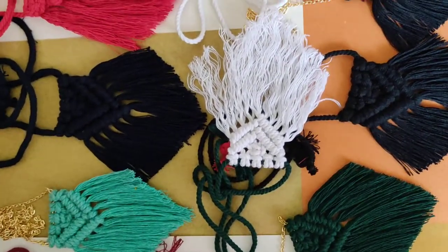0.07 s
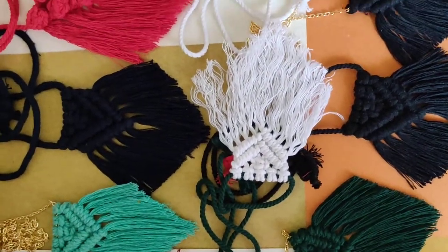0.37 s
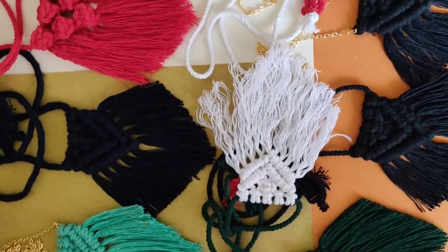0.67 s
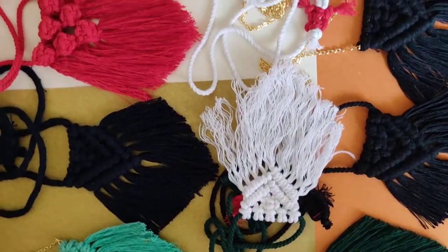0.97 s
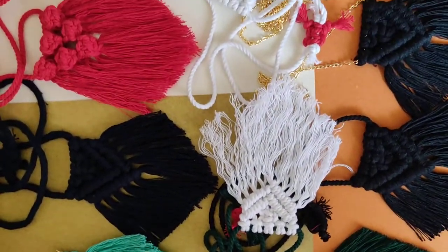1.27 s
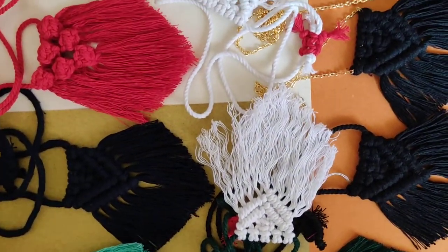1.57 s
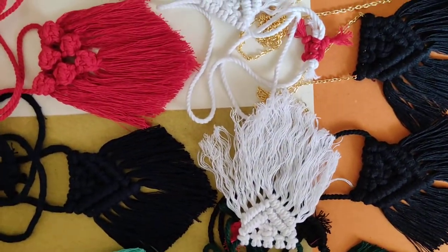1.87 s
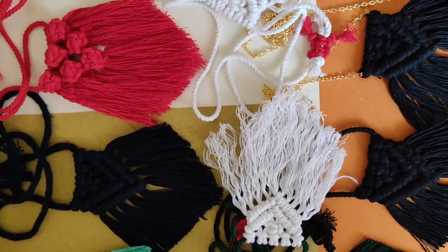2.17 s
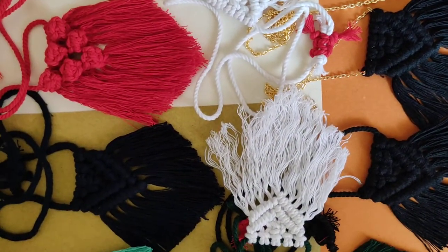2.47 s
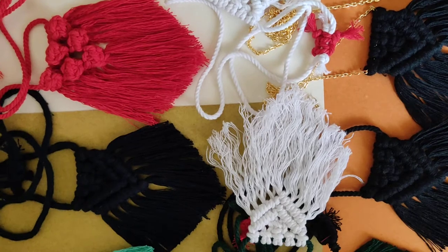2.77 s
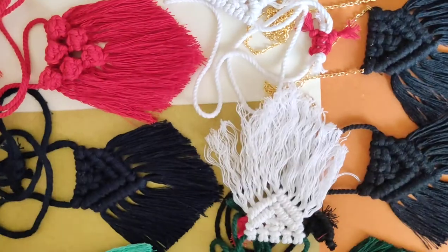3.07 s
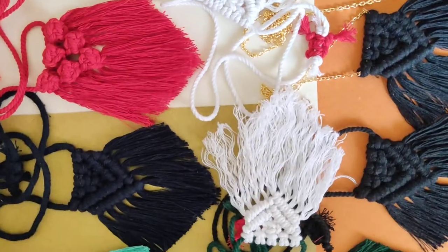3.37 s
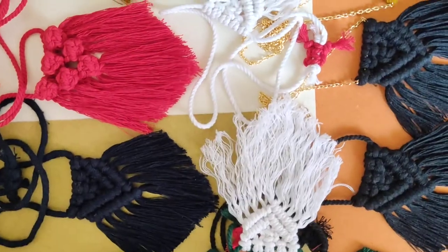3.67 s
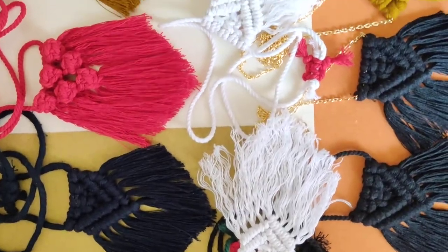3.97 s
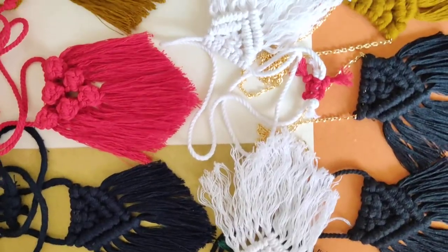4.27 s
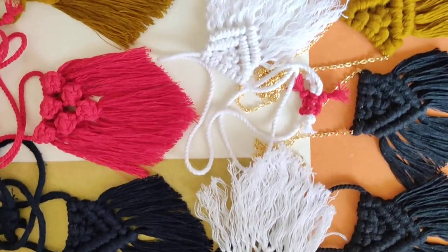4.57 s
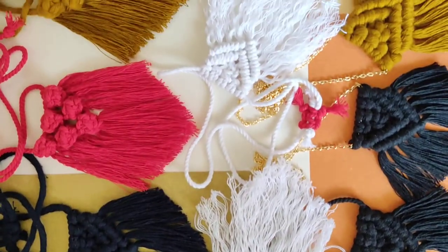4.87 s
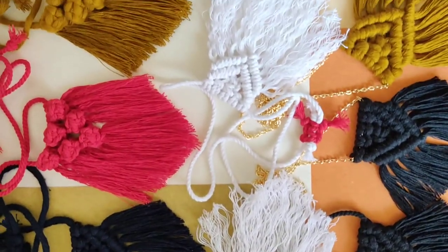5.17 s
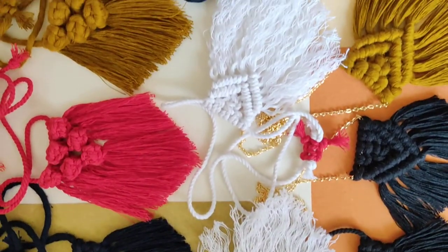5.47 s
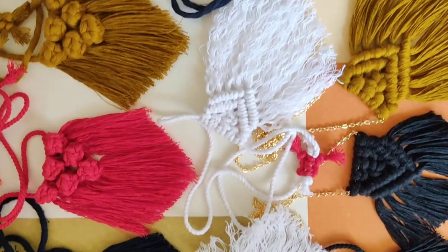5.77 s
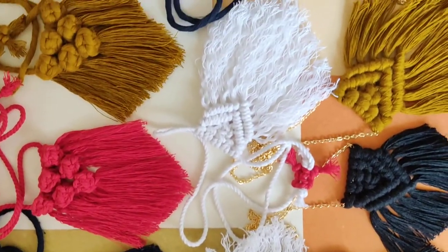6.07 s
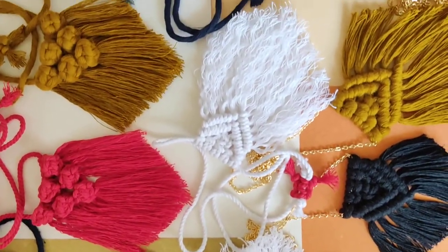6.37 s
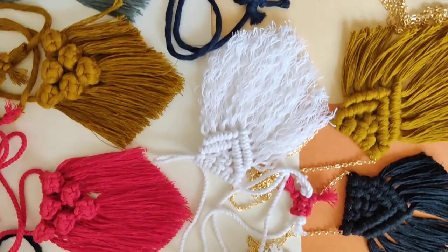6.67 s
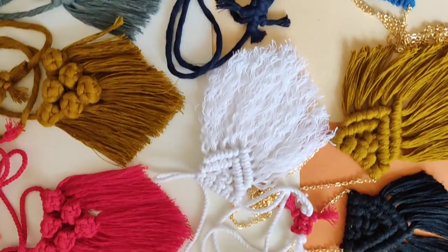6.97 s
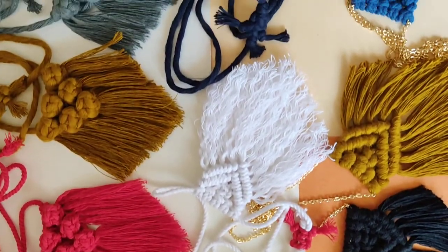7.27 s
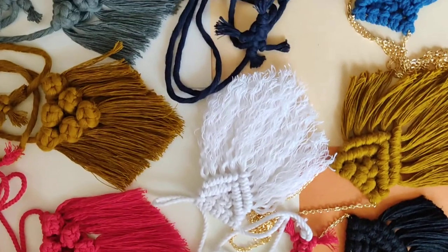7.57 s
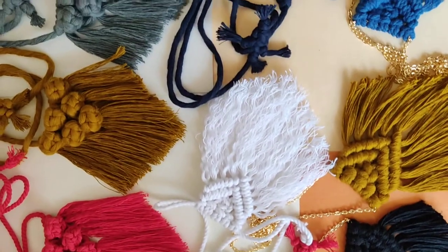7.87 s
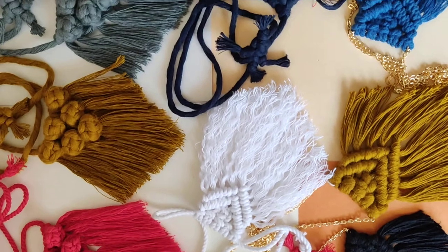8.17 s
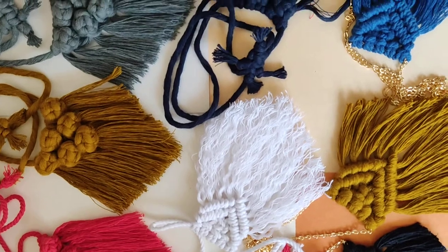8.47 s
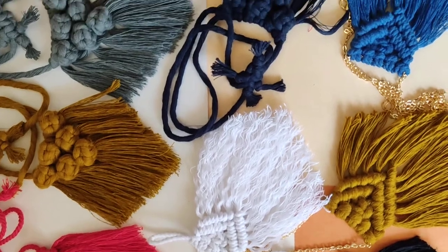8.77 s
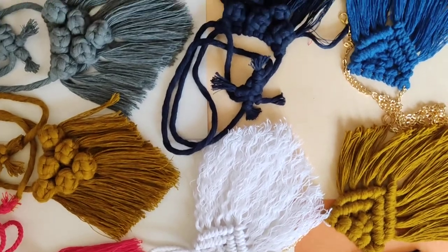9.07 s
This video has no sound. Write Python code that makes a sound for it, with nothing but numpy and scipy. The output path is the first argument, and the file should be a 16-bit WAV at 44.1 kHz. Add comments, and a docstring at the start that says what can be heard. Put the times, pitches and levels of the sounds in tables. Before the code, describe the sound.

Scattered brush strokes rub across a hollow-sounding board, then settle into unbroken, brisk scrubbing. The bristles rasp and hiss while the board booms underneath, and the tone shifts as the brush moves to another spot, adding a few short squeaks and ticks. A fan hums steadily in the small room, and the hand-held phone picks up occasional soft finger thuds.

```python
"""A fan drones in a small room as a brush starts on a board in stray strokes: the rubbing roars, the
board booms, the bristles rasp, hiss and tick. Now and then a finger bumps the hand-held phone.
From 1.3 s to 4 s some strokes ring the hollow under the board. Near 2.5 s the scrubbing turns
unbroken, about four strokes a second, with brief squeaks; from 5 s to 7 s it moves to a second spot
and changes colour. Throughout, each of the phone's two microphone ports rings near 8 kHz."""
import sys
import numpy as np
from scipy import signal
from scipy.fft import rfft, irfft, next_fast_len
from scipy.io import wavfile
from scipy.ndimage import uniform_filter1d

SR = 44100
rng = np.random.default_rng(int(sys.argv[2]) if len(sys.argv) > 2 else 0)


def transcribe(u):
    """Save the signal u as a 16-bit wav file named by the first command-line argument.

    u: samples, shape (n,) or (channels, n), limited to [-1, 1]; the rate is SR.
    q: integer samples, one column per channel.
    """
    v = np.clip(np.atleast_2d(u).T, -1, 1)
    q = np.round(v * 32767).astype(np.int16)
    wavfile.write(sys.argv[1], SR, q)


N = 411012
T = np.arange(N) / SR
FFT_SIZE = 2 * next_fast_len(N // 2 + 1024)
FREQ = np.maximum(np.arange(FFT_SIZE // 2 + 1) * SR / FFT_SIZE, 1)


def undb(db):
    """Decibels to gain."""
    return 10 ** (np.asarray(db) / 20)


def automation(table):
    """One lane per column after the time, with straight ramps between the rows."""
    times, *columns = np.transpose(table)
    return [np.interp(T, times, column) for column in columns]


def eq_curve(points):
    """Breakpoints joined by straight lines over log frequency."""
    hz, value = np.transpose(points)
    return np.interp(np.log(FREQ), np.log(hz), value)


def bell(hz, width):
    """Shape of one resonance, 1 at its centre."""
    return 1 / (1 + (2 * (FREQ - hz) / width) ** 2)


def colour(sound, gain):
    """EQ a sound with one gain per frequency."""
    return irfft(rfft(sound, FFT_SIZE) * gain, FFT_SIZE)[..., :N]


def normalise(pair, band_hz):
    """Scale a stereo pair so that its mid has rms 1 inside a band."""
    in_band = (FREQ > band_hz[0]) & (FREQ < band_hz[1])
    return pair / np.std(colour(pair.mean(0), in_band))


def leveller(pair, span_s):
    """Ride the gain to hold a sound's running rms near 1."""
    power = uniform_filter1d(np.mean(pair ** 2, axis=0), int(span_s * SR))
    return pair / np.sqrt(np.maximum(power, 1e-6 * power.mean()))


def wander(rate_hz):
    """Random modulator: sample and hold, slewed twice, with rms near 1."""
    hold = int(SR / rate_hz)
    steps = np.repeat(rng.standard_normal(N // hold + 1), hold)
    return 1.172 * uniform_filter1d(uniform_filter1d(steps, hold), hold)[:N]


# How alike the room sounds at the two ports: (frequency [Hz], correlation [-1..1])
PORT_CORRELATION = [(40, 0.61), (120, 0.86), (250, 1), (370, 0.19), (480, 0.14), (550, 0.59), (605, -0.16),
                    (800, 0.66), (1020, 0.3), (1200, -0.22), (1800, 0.017), (2500, 0.023), (4000, 0.0056)]
def spread(pair):
    """Two unrelated noises become left and right: narrow in the bass, wide in the treble."""
    likeness = np.clip(eq_curve(PORT_CORRELATION), -0.99, 0.99)
    mid, side = colour(pair, np.sqrt([1 + likeness, 1 - likeness]) / np.sqrt(2))
    return np.array([mid + side, mid - side]) / np.sqrt(2)


def grainy_noise(grain_db, grain_hz):
    """Stereo noise with a flickering level, like tiny slips bunching as a contact grips and lets go."""
    return spread(rng.standard_normal((2, N)) * undb(grain_db * wander(grain_hz)))


# Tone of the fan's moving air: (frequency [Hz], relative level [dB])
FAN_EQ = [(25, -1), (43, -7), (60, -6), (81, -5.5), (124, -20.5), (206, -9.5), (341, -23.5), (493, -16.5),
          (874, -23.5), (1290, -22.5), (1450, -29), (2000, -30.5), (2240, -35), (6000, -52.5)]
def fan(air_db, hum_hz, hum_db):
    """The bed: steady moving air and a wavering motor hum."""
    treble_cut_db = 6 * np.log2(np.maximum(FREQ / 5000, 1))
    bass_cut_db = 10 * np.log2(np.maximum(38 / FREQ, 1))
    tone = undb(eq_curve(FAN_EQ) - treble_cut_db - bass_cut_db)
    air = normalise(colour(grainy_noise(grain_db=1.5, grain_hz=9.2), tone), band_hz=(150, 3000))
    phase = 2 * np.pi * np.cumsum(hum_hz + 1.147 * wander(5.4)) / SR
    hum = np.sqrt(2) * np.sin(phase) * undb(0.82 * wander(7.7))
    return undb(air_db) * air + undb(hum_db) * hum


def stroke(start, attack, length, release_s=0.27):
    """Envelope of one push: the load rises, holds to the stroke's end, then falls 60 dB per release."""
    age = T - start
    return np.clip(age / attack, 0, 1) * undb(-60 * np.maximum(age - length, 0) / release_s)


# The brush dragging on between strokes, levels before trim:
# (time [s], rubbing [dB], rasp [dB], hiss [dB], boom [dB])
DRAG_LEVELS = [(0.0, -58.5, -66, -78, -55.5), (2.38, -49.5, -63, -74, -48.5), (2.65, -35, -52, -48.5, -39),
               (3.1, -44, -61, -59, -45.5), (3.4, -43.5, -54, -68.5, -40.5), (3.7, -39, -53.0, -52.5, -35),
               (4.1, -43.5, -54, -55.5, -40.5), (4.5, -35.5, -54, -52.5, -38),
               (4.95, -37.5, -51.5, -60.5, -45), (5.4, -37, -52, -53, -36), (6.1, -35.5, -50, -54.5, -41),
               (6.5, -35, -48.5, -54.5, -37.0), (7.0, -32, -43.5, -48, -33.5),
               (7.6, -33, -45.5, -49, -32.5), (8.2, -33.5, -43.5, -49.5, -32),
               (8.7, -32, -43.5, -46.5, -33.5), (8.93, -34, -45.5, -49, -36),
               (9.32, -31.5, -50, -48.5, -28.5)]
# Pushes of the brush, levels before trim:
# (start [s], attack [s], length [s], rubbing [dB], rasp [dB], hiss [dB], boom [dB])
BRUSH_STROKES = [(0.257, 0.028, 0.073, -36.5, -59, -82, -41.5),
                 (0.461, 0.034, 0.045, -36.5, -62.5, -74, -38), (0.843, 0.04, 0.069, -47, -58, -85, -50),
                 (1.02, .03, 0.075, -52, -63, -82, -52), (1.273, 0.019, 0.013, -39, -60, -67, -37),
                 (1.415, 0.048, 0.08, -35.5, -51.5, -53.5, -37.5),
                 (1.619, 0.036, 0.078, -38, -49, -55.5, -39), (1.73, 0.014, 0.057, -40, -63, -68, -43),
                 (1.885, 0.019, 0.13, -43.5, -59, -71, -43.5), (2.064, 0.02, 0.085, -51, -58, -72, -55),
                 (2.431, 0.019, 0.068, -32.5, -46.5, -51, -32.5),
                 (2.592, 0.01, 0.02, -49, -56, -65.5, -29.5),
                 (2.639, 0.037, 0.063, -30.5, -41.5, -45, -25.5),
                 (2.797, 0.077, 0.12, -36.5, -47, -48, -30.5), (2.922, 0.025, 0.083, -35, -47, -52, -41),
                 (3.135, 0.03, 0.042, -35, -46, -55, -47), (3.446, 0.038, 0.078, -33.5, -50, -55.5, -36),
                 (3.67, 0.043, 0.066, -34, -45.5, -48.5, -28),
                 (3.849, 0.063, 0.17, -36.5, -48.5, -51.5, -32.5), (4.1, 0.011, 0.057, -42, -63, -66, -28),
                 (4.161, 0.03, 0.071, -31.5, -42.5, -47.5, -31), (4.29, 0.02, 0.031, -40, -60, -55, -32),
                 (4.388, 0.031, 0.071, -30.5, -46, -51, -27.5),
                 (4.631, 0.0018, 0.032, -29.5, -58, -74, -35), (4.67, 0.017, 0.06, -41, -45, -52.5, -42),
                 (4.77, 0.034, 0.066, -37, -48, -53.5, -38.5), (4.839, 0.018, 0.038, -31, -53, -57, -39),
                 (4.996, 0.027, 0.064, -34, -45.5, -53, -32.5), (5.213, 0.038, 0.088, -33, -44, -47.5, -28),
                 (5.438, 0.036, 0.13, -32.5, -46, -50.0, -30.5),
                 (5.691, 0.053, 0.11, -29.5, -42.5, -47.5, -31),
                 (5.826, 0.012, 0.055, -32, -43, -49.5, -29.5), (5.911, 0.025, 0.13, -33.0, -49, -49, -32),
                 (6.047, 0.029, 0.041, -32, -44, -48.5, -25),
                 (6.205, 0.0042, 0.072, -30.5, -45, -55.5, -33.5),
                 (6.318, 0.039, 0.016, -51, -49.5, -46.5, -45), (6.444, 0.017, 0.023, -31, -51, -66, -36),
                 (6.595, 0.039, 0.047, -38, -60, -50, -44), (6.72, 0.014, 0.037, -48, -41, -51, -41),
                 (6.8, 0.036, 0.11, -37, -41.5, -45.5, -29), (6.91, 0.025, 0.034, -32, -35.5, -47, -25.5),
                 (7.088, 0.025, 0.066, -33.5, -36, -45.5, -49), (7.15, 0.025, 0.028, -38, -47, -51, -33),
                 (7.327, 0.031, 0.096, -31, -48, -47, -31.5), (7.669, 0.039, 0.053, -39, -45, -49, -29),
                 (7.843, 0.016, 0.056, -28.5, -45, -64, -31), (7.885, 0.011, 0.052, -36, -37.5, -44.5, -36),
                 (8.082, 0.0038, 0.018, -29, -40.5, -46.5, -35),
                 (8.324, 0.035, 0.051, -51, -45.5, -49, -44), (8.405, 0.012, 0.04, -55, -56, -58, -28.5),
                 (8.47, 0.034, 0.081, -38, -47, -44.5, -29.5), (8.563, 0.031, 0.14, -38, -46, -62, -32.5),
                 (8.738, 0.027, 0.14, -34.5, -45, -49, -29), (8.96, 0.026, 0.083, -33.5, -53, -51, -30),
                 (9.026, 0.028, 0.15, -38, -41, -47, -28.5), (9.242, 0.035, 0.093, -32, -41, -44.5, -31.5)]
def hand_pressure():
    """Envelopes of rubbing, rasp, hiss and boom: the strokes ride on the drag, adding in power."""
    power = undb(automation(DRAG_LEVELS)) ** 2
    for start, attack, length, *levels_db in BRUSH_STROKES:
        power += np.outer(undb(levels_db) ** 2, stroke(start, attack, length) ** 2)
    return np.sqrt(power)


# Resonances shared by rubbing, rasp and hiss: (centre [Hz], width [Hz], boost [dB])
SURFACE_PEAKS = [(385.6, 18.4, 8), (486.5, 19.6, 6.5), (555, 16, 8), (629, 76, 6.5), (721, 26, 4),
                 (787, 26, 4), (966, 130, 2.5), (1180, 55, 5), (2030, 27, -1.5), (5160, 54, 4),
                 (6160, 32, 3)]
def surface(broad_eq):
    """Gain per frequency: a broad EQ with the rubbed surface's resonances on top."""
    return undb(eq_curve(broad_eq) + sum(db * bell(hz, width) for hz, width, db in SURFACE_PEAKS))


# Tone of the rubbing at each of two spots: (frequency [Hz], relative level [dB])
FIRST_SPOT_EQ = [(120, -40), (280, -2.5), (350, -4.5), (450, 3), (600, -0.5), (850, -5.5), (1050, -1),
                 (1400, -19.5), (2500, -41), (5000, -52)]
SECOND_SPOT_EQ = [(120, -31), (270, -7), (340, 3), (450, 1), (600, -3), (850, -2), (1050, -2.5),
                  (1400, -13.5), (2000, -14.5), (5000, -51)]
def rubbing(place):
    """The body: countless slips blur into a hollow roar, crossfaded between the two spots."""
    slips = grainy_noise(grain_db=1.5, grain_hz=120)
    first = colour(slips, surface(FIRST_SPOT_EQ))
    second = colour(slips, surface(SECOND_SPOT_EQ))
    roar = leveller((1 - place) * first + place * second, span_s=0.08)
    return normalise(roar, band_hz=(350, 1300))


# Tone of the flattened bristles: (frequency [Hz], relative level [dB])
RASP_EQ = [(700, -36), (1300, 1), (1550, -2), (1970, 0.5), (2250, -2), (2650, -2.5), (3200, -11.5),
           (5000, -28.5)]
def rasp():
    """The bite: the coarse scrape of bristles pressed flat."""
    scrape = colour(grainy_noise(grain_db=1.5, grain_hz=350), surface(RASP_EQ))
    return normalise(scrape, band_hz=(1400, 3000))


# Tone of the sweeping bristles: (frequency [Hz], relative level [dB])
HISS_EQ = [(1500, 0), (2600, 3), (3300, 0.5), (4500, 1), (6200, -2), (9000, -5), (10000, -9)]
def bristle_hiss():
    """The top: bristles sweep the surface with a fine, slightly grainy hiss."""
    hiss = colour(grainy_noise(grain_db=0.5, grain_hz=540), surface(HISS_EQ))
    return normalise(hiss, band_hz=(3300, 6500))


# Modes of the board: (centre [Hz], width [Hz], weight at first spot [dB], weight at second spot [dB])
BOARD_MODES = [(132, 36, -3.5, -9), (171, 21, -17.5, -8.5), (208.4, 17.6, 6.5, -6),
               (229.6, 23.4, 2.5, -1.5), (266, 26, -4, 1.5), (326, 42, -28.5, -13)]
def board_boom(place):
    """The low end: the dragging contact shakes the board's modes; their mix depends on the spot."""
    drag = grainy_noise(grain_db=3, grain_hz=44)
    first = colour(drag, sum(undb(db) * bell(hz, width) for hz, width, db, _ in BOARD_MODES))
    second = colour(drag, sum(undb(db) * bell(hz, width) for hz, width, _, db in BOARD_MODES))
    boom = leveller((1 - place) * first + place * second, span_s=0.07)
    return normalise(boom, band_hz=(195, 300))


# Soft low thuds, mostly fingers on the phone; the one at 4.12 s is a low board thump:
# (start [s], relative level [dB], cutoff [Hz], time to peak [s])
LOW_THUDS = [(0.161, -19, 239, 0.026), (0.644, -34, 120, 0.013), (1.354, -20, 200, 0.023),
             (2.165, -27.5, 139, 0.03), (4.12, -35, 208, 0.021), (4.7, -28, 111, .03),
             (4.81, -25, 119, 0.021), (5.244, -33, 191, .035), (6.122, -17, 129, 0.0049),
             (7.921, -26, 202, 0.024)]
def low_thuds(gain_db, right_db):
    """Short swells of low noise, far to the left; most are fingers heard through the phone's case."""
    out = np.zeros(N)
    for start, db, cutoff, swell_s in LOW_THUDS:
        age = np.maximum(T - start, 0) / swell_s
        low_band = 1 / np.sqrt((1 + (FREQ / cutoff) ** 8) * (1 + (0.18 * cutoff / FREQ) ** 4))
        thud = colour(rng.standard_normal(N), low_band) * age ** 2 * np.exp(-2 * age)
        rms = np.sqrt(np.sum(thud ** 2) / (2 * swell_s * SR))
        out += undb(db) * thud / rms
    return out * undb(gain_db + np.array([[0], [right_db]]))


# Bristle flicks, brush landings and one thin, very high click at 7.13 s:
# (time [s], relative level [dB], rustle T60 [s], centre [Hz], width [Hz], right minus left [dB])
TICKS = [(.231, -48, 0.2, 7700, 2500, 3), (1.9938, -26, .003, 2150, 2200, 0),
         (2.0067, -41, 0.0044, 10100, 5000, -8), (2.179, -43, .015, 3800, 2000, 2),
         (2.43, -24, .04, 470, 300, 0), (4.632, -23, .015, 900, 700, -3), (6.212, -24, .03, 890, 900, 0),
         (6.927, -33.5, .06, 7500, 600, 9), (7.119, -33, .09, 7760, 1600, 24.5),
         (7.1275, -27, .003, 12200, 1200, 8), (7.129, -40, .08, 7850, 1200, 20),
         (7.899, -38, .12, 7460, 2000, 16), (8.0845, -36, 0.093, 7460, 2000, 13),
         (8.343, -37, .1, 7500, 2000, 11)]
def ticks(gain_db, rustle_db, snap_s=0.0012):
    """Sharp transients with a short rustle; most are a bristle snapping free or the brush landing."""
    out = np.zeros((2, N))
    for start, db, t60, hz, width, pan_db in TICKS:
        age = np.maximum(T - start, 0)
        envelope = (T > start) * (np.exp(-age / snap_s) + undb(rustle_db - 60 * age / t60))
        noise = colour(rng.standard_normal((2, N)), bell(hz, width))
        gains = undb(db + gain_db + np.array([[-pan_db], [pan_db]]) / 2)
        out += noise / np.std(noise) * envelope * gains
    return out


# Air modes under the board: (centre [Hz], width [Hz], weight at edge [dB], weight at middle [dB])
HOLLOW_MODES = [(387, 24, 0, -20), (488, 34, -8, -9.5), (549, 13, 0, 1), (605, 36, -17, -7),
                (807, 14, -13, -7)]
# The brush crossing the hollow: (start [s], length [s], level [dB], spot [0 edge, 1 middle])
HOLLOW_CROSSINGS = [(1.284, 0.033, -37, 1), (1.45, 0.082, -37, 0), (1.746, 0.054, -46, 1),
                    (1.889, 0.091, -37.5, 0), (2.1, 0.059, -36, 0), (2.703, 0.093, -44, 1),
                    (2.798, .12, -32.5, 1), (3.49, 0.067, -29, 1), (3.907, .11, -34.5, 1)]
def hollow_ring(attack_s):
    """Some strokes ring the air under the board, with one colour at its edge and one at its middle."""
    air = grainy_noise(grain_db=0.5, grain_hz=60)
    edge_eq = sum(undb(db) * bell(hz, width) for hz, width, db, _ in HOLLOW_MODES)
    middle_eq = sum(undb(db) * bell(hz, width) for hz, width, _, db in HOLLOW_MODES)
    edge = leveller(colour(air, edge_eq), span_s=0.04)
    middle = leveller(colour(air, middle_eq), span_s=0.037)
    return sum(undb(db) * stroke(start, attack_s, length) * (middle if at_middle else edge)
               for start, length, db, at_middle in HOLLOW_CROSSINGS)


# Stick-slip tones, from low judder to thin squeak: (start [s], length [s], pitch [Hz], level [dB])
STICK_SLIPS = [(2.426, .03, 1280, -42), (3.68, .08, 1372, -46), (6.933, .03, 270, -26),
               (6.93, .11, 1972, -44), (6.94, .14, 5310, -57), (7.158, .045, 330, -29),
               (8.088, .06, 1030, -35), (8.425, .1, 6158, -53.5), (8.5, .11, 5873, -56),
               (8.62, .08, 258, -29.5)]
def squeaks(waver_hz, flutter_db, fade_s):
    """The brush sticks and slips almost regularly: a brief, rough tone that ends as the grip breaks."""
    drift_hz = waver_hz * wander(250)
    flutter = undb(flutter_db * wander(90))
    out = np.zeros(N)
    for start, length, hz, db in STICK_SLIPS:
        grip = np.clip(np.minimum(T - start, start + length - T) / fade_s, 0, 1)
        phase = 2 * np.pi * np.cumsum(hz + drift_hz) / SR
        out += undb(db) * grip * np.sqrt(2) * np.sin(phase)
    return flutter * out


def room(pair, t60_s, wet_db, paths=4):
    """Close walls return short, dense tails; their blend drifts at random, as if the brush moved."""
    sends = np.array([wander(3) for _ in range(paths)])
    sends /= np.sqrt(np.sum(sends ** 2, axis=0))
    tail_samples = SR // 4
    noise = spread(rng.standard_normal((2, N)))[:, :paths * tail_samples]
    tails = noise.reshape(2, paths, -1) * undb(-60 * T[:tail_samples] / t60_s)
    tails /= np.sqrt(np.sum(tails ** 2) / (2 * paths))
    feeds = sends * pair[0]  # the left channel feeds the reverb
    reverb = signal.oaconvolve(feeds[None], tails, axes=2).sum(1)[:, :N]
    return pair + undb(wet_db) * reverb


# Where the brush works on the board: (time [s], place [0 first spot .. 1 second spot])
BRUSH_PATH = [(0, 0.014), (5.2, 0.17), (7.1, 1), (9.3, 0.89)]
def scene():
    """The mix: roar, bristles and ticks through the room; boom, ring, squeaks, fan and thuds dry."""
    rub_env, rasp_env, hiss_env, boom_env = hand_pressure()
    rub_trim, rasp_trim, hiss_trim, boom_trim = undb([-0.86, 0.5, -0.4, -0.64])
    place = automation(BRUSH_PATH)[0]
    roar = room(rubbing(place) * rub_env * rub_trim, t60_s=0.14, wet_db=-7.5)
    brush = rasp() * rasp_env * rasp_trim + bristle_hiss() * hiss_env * hiss_trim
    highs = room(brush + ticks(gain_db=-8.0, rustle_db=-3.5), t60_s=0.21, wet_db=-5.0)
    boom = board_boom(place) * boom_env * boom_trim
    squeal = squeaks(waver_hz=22, flutter_db=3.5, fade_s=0.01)
    ring = hollow_ring(attack_s=0.016)
    drone = fan(air_db=-42, hum_hz=76.3, hum_db=-50.5)
    thuds = low_thuds(gain_db=-5.0, right_db=-34.0)
    return drone + roar + highs + boom + thuds + ring + squeal


# Ring of the microphone ports, left then right: (centre [Hz], width [Hz], boost [dB])
PORT_RINGS = [(8500, 1380, 9), (7566, 1800, 15.5)]
# The phone's steep roll-off above that ring: (frequency [Hz], gain [dB])
TREBLE_ROLLOFF = [(9150, 0), (9600, -7), (10100, -28.5), (11300, -22), (12700, -46)]
# Stereo balance of the ports: (frequency [Hz], left minus right [dB])
PORT_BALANCE = [(40, 7.5), (220, 1.5), (400, 4), (1100, 3.5), (2500, 2), (4000, -1), (6000, -2.5),
                (9000, 5)]
def record(dry):
    """Each microphone port rings at its own pitch; the phone cuts the top."""
    ring_db = np.array([db * bell(hz, width) for hz, width, db in PORT_RINGS])
    balance_db = np.array([[1], [-1]]) * eq_curve(PORT_BALANCE) / 2
    sound = colour(dry, undb(ring_db + eq_curve(TREBLE_ROLLOFF) + balance_db))
    high_cut = signal.ellip(8, 0.2, 70, 12700, fs=SR, output="sos")
    return signal.sosfilt(high_cut, sound)


dry = scene()
out = record(dry)
transcribe(out)
```